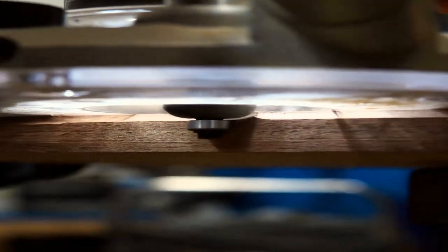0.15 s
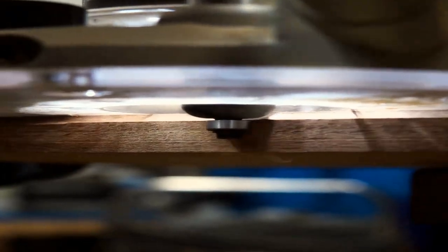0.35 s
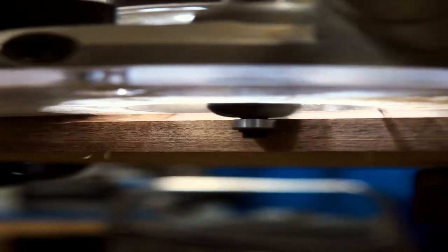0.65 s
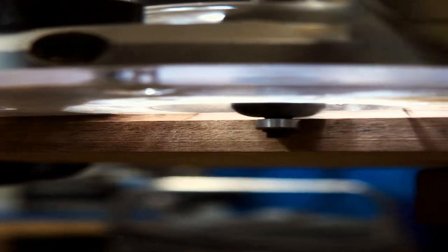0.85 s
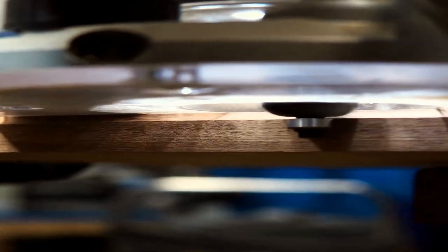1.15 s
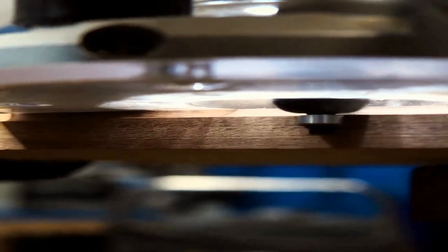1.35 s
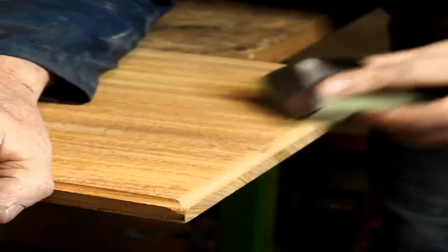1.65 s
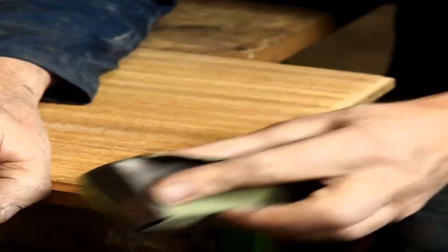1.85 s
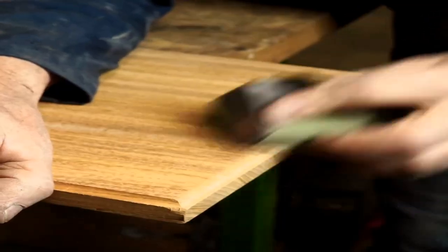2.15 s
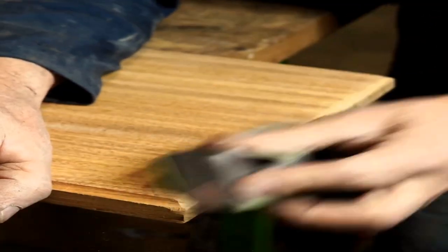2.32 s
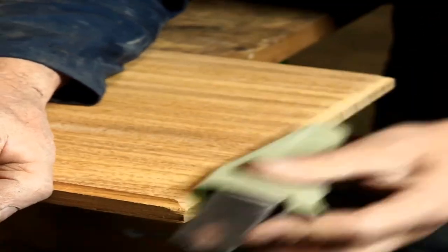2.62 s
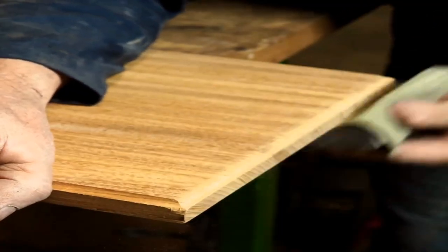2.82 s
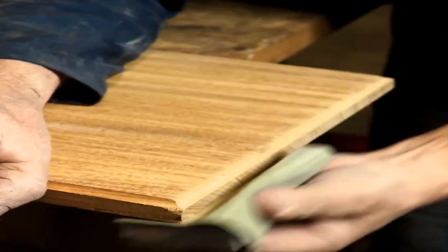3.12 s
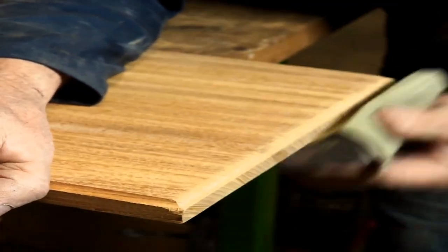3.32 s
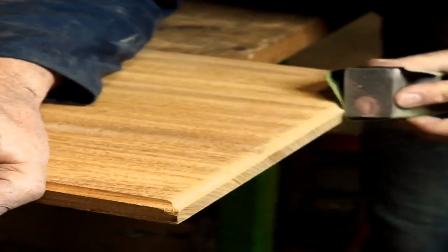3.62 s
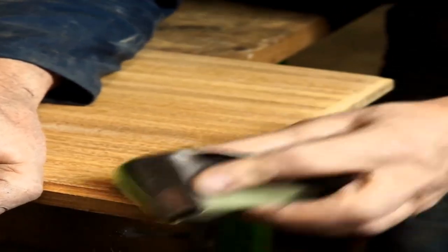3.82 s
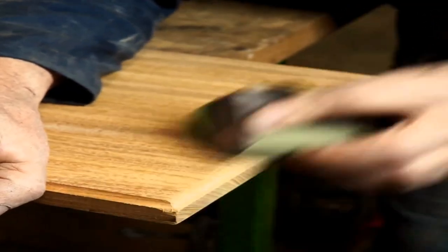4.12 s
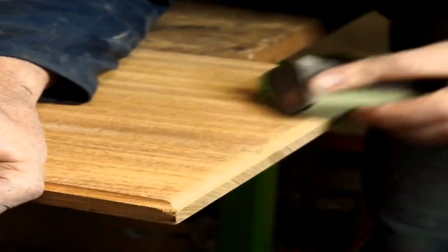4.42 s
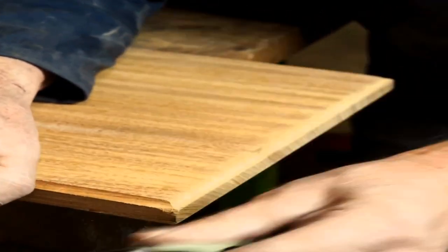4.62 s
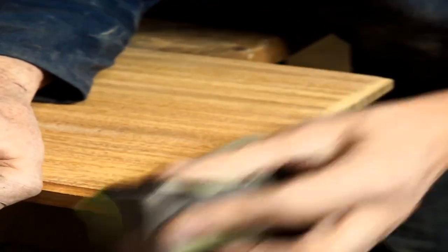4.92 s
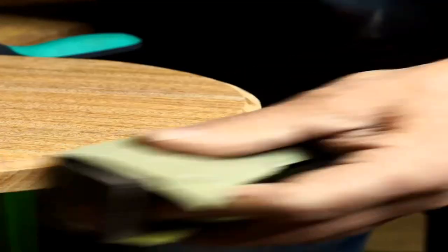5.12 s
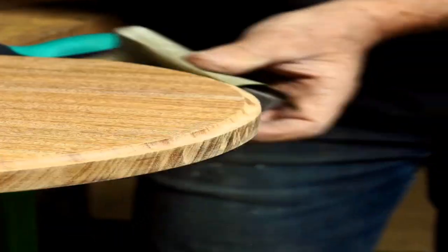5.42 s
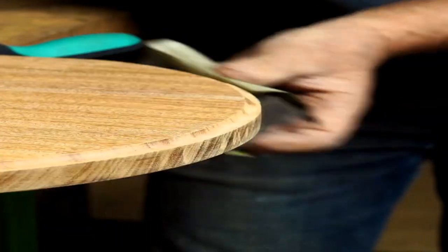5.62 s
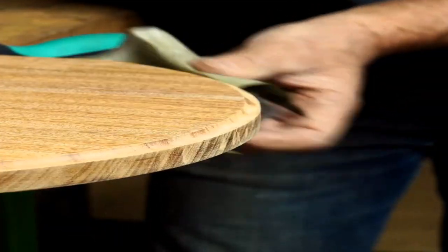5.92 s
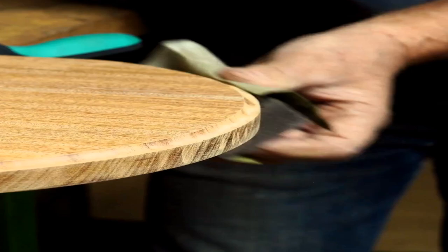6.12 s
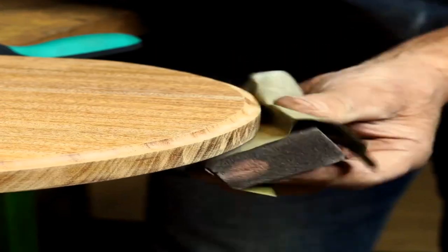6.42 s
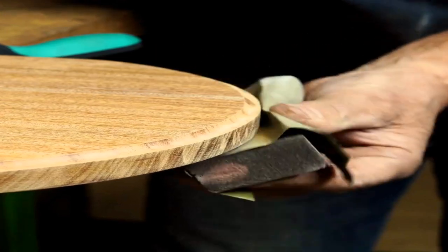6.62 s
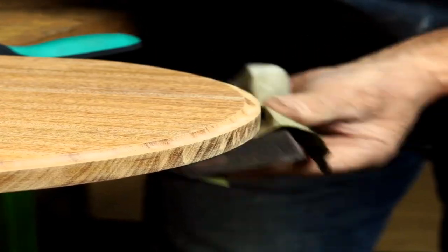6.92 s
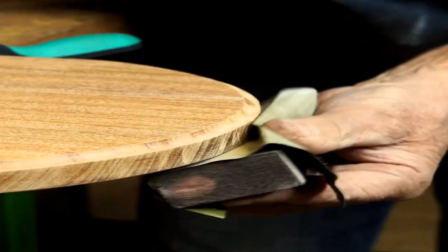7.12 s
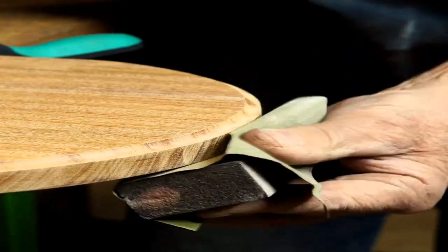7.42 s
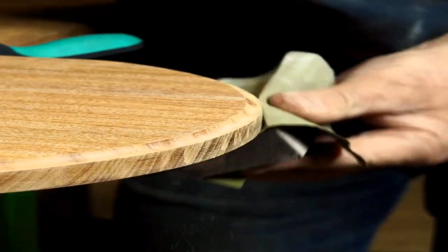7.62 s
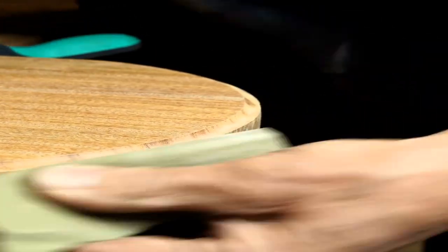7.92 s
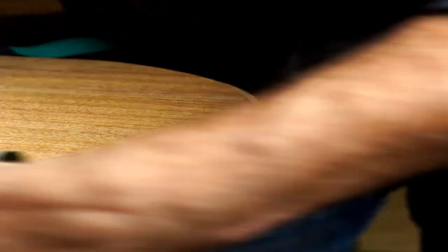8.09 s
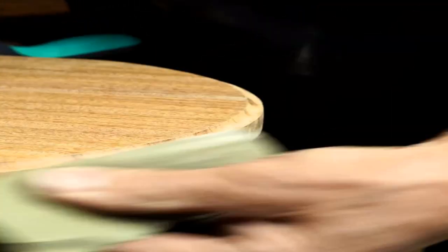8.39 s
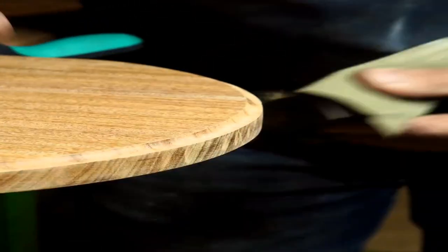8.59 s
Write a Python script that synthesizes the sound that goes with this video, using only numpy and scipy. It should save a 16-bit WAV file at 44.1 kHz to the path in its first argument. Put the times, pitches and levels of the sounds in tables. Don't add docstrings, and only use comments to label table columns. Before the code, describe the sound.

In a small workshop, an electric router cuts wood with a steady, buzzing harmonic whine and a rush of chip hiss for about a second. It stops abruptly, and a hand sanding block scratches quickly along a straight board edge, with knocks and low bench thuds. Then shorter, faster strokes rub a round board that rings more, ending in dragging rubs and a faint last touch. Close, wide stereo with a short room.

```python
import sys
import numpy as np
from scipy import signal
from scipy.io import wavfile

SR = 44100
rng = np.random.default_rng(int(sys.argv[2]) if len(sys.argv) > 2 else 0)


def gain_from_db(level_db):
    decades = np.asarray(level_db, float) / 20
    return 10 ** decades


def wav_out(sig):
    wavfile.write(sys.argv[1], SR, np.round(np.clip(np.atleast_2d(sig).T, -1, 1) * 32767).astype(np.int16))


N = 385875
STEP = 64
SANDING_FROM_S, ROUND_FROM_S = 1.084, 4.74

# echo delay in ms, sway of the delay in ms, level in dB.
ECHOES = [
    [(0.3, 0.25, -1.5), (2.3, 0.304, -6), (4.9, 0.394, -6), (8.6, 0.52, -2)],
    [(1.4, 0.261, -1), (3.1, 0.286, -1.5), (6.2, 0.378, -4), (11, 0.566, -13)],
]
# frequency in Hz, T60 in seconds.
SHOP_T60 = [(100, 0.13), (1000, 0.26), (4000, 0.59), (9000, 0.25), (16000, 0.019)]

# level in dB rms in phase, then in antiphase, at the
WHINE = [(-87, -42, -89.5, -37, -86.5, -39), (-42, -40, -46, -49, -44.5, -52),
         (-38, -48, -38, -46, -38.5, -37.0), (-34.5, -27, -35, -31, -35, -27),
         (-40, -39.5, -35.5, -46, -33, -34.0), (-48, -40, -39.5, -40.5, -34.5, -30),
         (-54, -43, -48, -43, -42, -61.5), (-40.5, -41, -37.5, -35.5, -37.5, -44.0),
         (-42, -42.5, -41.5, -39.0, -41, -41), (-46, -48.0, -44, -44.5, -39, -37),
         (-47, -43.5, -37, -34, -41, -61.0), (-43, -30, -43, -35.0, -33, -31),
         (-51, -46.0, -56, -45.5, -42, -41.0), (-39, -41.5, -40, -43, -38, -34),
         (-48, -43.0, -40, -45, -40, -41.5), (-66, -45, -37, -33, -51, -38),
         (-50, -45.0, -41, -41, -41.5, -40.0), (-51, -46.0, -46, -44.0, -46, -47.5),
         (-58, -49.0, -50, -47.5, -48, -55.0), (-56.0, -46.0, -56, -44.5, -52.0, -48.0),
         (-48, -47.0, -41, -36, -43, -40), (-55.5, -51.5, -45, -49.0, -51, -53.5),
         (-44, -58.0, -50, -53.5, -57.0, -58.5), (-63, -55.0, -48, -63.0, -51.5, -55.5),
         (-63, -52.5, -44, -52.5, -61, -59.5), (-61, -54.0, -49, -50.0, -68.0, -54.5),
         (-58, -54, -46, -49.5, -52.0, -51.5), (-53.5, -59.5, -55.0, -48.0, -49, -54.5),
         (-47, -60.5, -69, -80.0, -55, -50.5), (-60, -58.5, -58, -49.5, -62, -74.0)]
# time in seconds, chip hiss in dB, whine gain in dB.
CUT = [
    (0.0, -24.5, 3.5),
    (0.17, -25, 0.5),
    (1.06, -26, -2),
]
# time in seconds, gain in dB.
FLARE = [(0, -6), (.1, -6), (.16, 9), (.3, -5), (.55, 5.5), (.68, 3), (.85, -3), (1.1, -2)]
# frequency in Hz, level in dB per Hz.
CHIP_HISS = [(40, -46), (150, -20), (230, -21), (330, -16.5), (560, -10), (1000, -9), (1800, -7.5),
             (2100, -10.5), (3500, -13), (5200, -14), (8500, -13.5), (11000, -20), (13500, -35), (16000, 2)]
# frequency in Hz, width in Hz, depth from 0 to 1.
BASE_NOTCHES = [(2010, 230, 0.8), (3800, 160, 0.6), (4170, 130, .6), (6200, 340, 0.7), (8100, 640, 0.4)]

# turn of the hand in seconds, grit at the turn in dB,
# grit at full speed in dB, dig into the wood in dB.
STRAIGHT_STROKES = [(1.084, -45, -24.5, -2), (1.31, -40, -26.5, 2.5), (1.56, -40, -26, -1),
                    (1.757, -48, -28.5, 3.5), (1.998, -44, -23, -4.5), (2.183, -40, -26, 1),
                    (2.404, -36.5, -29.5, 4.5), (2.599, -41, -28, 3), (2.784, -41.5, -32, 4.5),
                    (2.98, -46, -30.5, 4), (3.137, -41.5, -27.5, 2.5), (3.323, -36, -28.5, 2),
                    (3.528, -38.5, -26, -1), (3.69, -36.5, -29, 3), (3.89, -33, -26, -1.5),
                    (4.06, -39, -33, 6), (4.22, -27, -27, 1), (4.525, -48, -25.5, -3.5),
                    (4.62, -27.5, -30, 3.5)]
# turn in seconds, grit at the turn in dB, at full speed in dB,
# dig in dB.
QUICK_STROKES = [(5.153, -44, -28, 0.2), (5.276, -40, -25, -1.5), (5.38, -36, -28.5, -1.5),
                 (5.48, -41.5, -25.5, -2.5), (5.589, -42, -29.5, 1.5), (5.681, -43, -30.5, 0),
                 (5.782, -42, -29.5, -1), (5.896, -40.5, -33.5, 2), (6.003, -41, -26, -3.5),
                 (6.104, -38, -27.5, -2), (6.217, -38.5, -29.5, -3), (6.337, -35.5, -29, -2),
                 (6.442, -43, -27.5, -0.5), (6.55, -35, -26.5, -2.5), (6.683, -41, -27.5, 0),
                 (6.82, -36, -27, 0), (6.96, -39.5, -23.5, -2), (7.134, -39, -30, 1)]
# turn in seconds, grit at the turn in dB, at full speed in dB, dig in dB.
DRAGS = [(4.737, -44.5, -31.5, -0.5), (4.87, -32.5, -33, 1.5), (5.02, -35, -31, -2),
         (7.267, -41, -27.5, -4.5), (7.6, -33.5, -36.5, 4.5), (7.79, -41.5, -39.5, 0.5),
         (7.882, -62.5, -43.5, 4), (8.011, -33, -31, 6), (8.134, -31.5, -29, 3.5), (8.29, -50, -54.5, 10.5),
         (8.46, -62, -48.5, 0.5), (8.62, -46.5, -47.5, -0.5), (8.76, -51, -51, -17)]
# turn in seconds, part of the stroke
STROKE_SHAPE = [(1.084, 0.46, 1.44), (1.31, 0.48, 1.5), (1.56, 0.51, 0.75), (1.757, 0.54, 0.46),
                (1.998, 0.47, 0.5), (2.183, 0.44, 1.1), (2.404, 0.46, 2.4), (2.599, 0.58, 1.9),
                (2.784, 0.44, 0.88), (2.98, 0.51, 0.98), (3.137, 0.34, 1.7), (3.323, 0.52, 1.8),
                (3.528, 0.68, 1.05), (3.69, 0.49, 2.1), (3.89, 0.42, 1.5), (4.06, 0.47, 1.4),
                (4.22, 0.18, 4.3), (4.515, 0.53, 1.35), (4.736, 0.62, 2.6), (4.87, 0.77, 2),
                (5.02, 0.63, 1.7), (5.153, 0.46, 1.9), (5.276, 0.58, 2.8), (5.38, 0.58, 1.5),
                (5.48, 0.58, 1.4), (5.589, 0.39, 0.94), (5.681, 0.65, 1.3), (5.782, 0.43, 1.4),
                (5.896, 0.57, 1.8), (6.003, 0.45, 1.3), (6.104, 0.59, 1.1), (6.217, 0.37, 2),
                (6.337, 0.54, 0.67), (6.442, 0.6, 0.9), (6.55, 0.66, 0.93), (6.683, 0.37, 1.2),
                (6.82, 0.7, 1.1), (6.96, 0.61, 1.2), (7.134, 0.63, 1.2), (7.267, 0.26, 3), (7.6, 0.6, 2.4),
                (7.79, 0.22, 2.1), (7.882, 0.13, 2.7), (8.012, 0.45, 0.8), (8.134, 0.33, 2),
                (8.29, 0.23, 3.4), (8.46, 0.55, 1.7), (8.62, 0.75, 2), (8.76, 0.5, 1),
                (4.62, 0.22, 2.3),
]

# time in seconds, peak in dB.
KNOCKS = [(1.153, -29), (1.324, -43), (1.474, -38), (1.592, -32), (1.773, -45), (2.036, -29), (2.149, -46),
          (2.273, -28), (2.383, -45), (2.492, -36), (2.644, -40), (2.796, -31), (2.999, -38),
          (3.107, -29.5), (3.178, -43), (3.303, -42), (3.473, -41), (3.754, -24), (4.088, -37),
          (4.315, -29), (4.631, -41), (4.757, -42), (4.923, -41), (5.07, -34), (5.205, -36), (5.276, -47),
          (5.356, -36), (5.455, -43), (5.602, -34), (5.809, -36), (5.955, -31), (6.076, -39), (6.236, -39),
          (6.383, -39), (6.515, -49), (6.714, -45), (6.858, -44), (6.934, -35), (7.14, -49), (7.49, -38),
          (7.634, -31), (7.742, -30), (7.894, -43), (8.02, -40)]
# frequency in Hz, width in Hz, level in dB.
KNOCK_BODY = [(335, 54, -8), (418, 47, -6), (614, 110, 8)]
# time in seconds, thud in dB.
JOLTS = [(1.2, -50), (1.36, -52), (1.74, -50), (1.95, -49), (2.27, -50), (2.64, -53), (2.811, -43.5),
         (3.154, -65), (3.39, -47), (3.77, -57), (4.09, -52.5), (4.33, -46), (4.5, -53), (4.861, -46),
         (5.16, -48), (5.37, -48), (5.54, -50), (5.78, -54), (5.91, -49), (6.03, -47), (6.19, -45),
         (6.4, -46), (6.63, -49), (6.87, -48), (7.02, -45), (7.2, -48), (7.53, -47), (8.042, -52),
         (8.21, -48)]
# frequency in Hz, width in Hz, level in dB.
BENCH_STRAIGHT = [(65, 33, -5.5), (94, 19, -1), (141.4, 26, 3.5)]
# frequency in Hz, width in Hz, level in dB.
BENCH_ROUND = [(60.3, 28, -13), (92, 36, 6), (140, 23, -4)]
# frequency in Hz, level in dB per Hz.
SCRAPE = [(200, -30.5), (300, -5), (450, -11.5), (700, -9), (1000, -3), (1300, -13.5)]
# time in seconds, scrape level in dB.
WEIGHT = [(1.1, -43), (2.3, -38.5), (2.6, -49), (3.75, -43), (4.1, -42.5), (4.6, -45), (5.0, -43),
          (5.25, -36), (6.6, -36), (6.85, -48), (7.3, -36), (7.55, -31.5), (7.72, -27.5), (7.85, -32.5),
          (7.93, -27.5), (8.0, -29.5), (8.1, -52), (8.7, -57)]
# time in seconds, tilt in dB per octave.
GRIP = [(1.15, -1), (1.35, 5.5), (1.6, 3), (2.0, 1.5), (2.3, -2.5), (2.8, 3), (3.3, 2), (3.75, -2),
        (4.2, -3), (4.7, 0), (5.2, 1), (6.0, 1.5), (6.8, -3), (7.45, 1), (7.6, 6), (7.95, 8), (8.2, 0),
        (8.6, -3)]

# middle in seconds, length in seconds, pitch in Hz,
# level in dB rms.
SINGING = [(4.932, 0.24, 1630, -25), (6.169, .08, 1750, -30), (6.3, .04, 1800, -26),
           (6.4, 0.091, 1830, -25), (6.619, 0.11, 1800, -27), (7.1, 0.13, 1640, -28),
           (7.462, .1, 1720, -32), (7.63, 0.12, 1686, -26), (8.069, 0.29, 1690, -27),
           (8.193, .14, 2390, -32), (8.639, 0.27, 2050, -45)]
# frequency in Hz, level in dB per Hz.
GRIT_STRAIGHT = [(700, -18), (1100, -14), (1600, -6), (2500, -3.5), (4100, -1), (5500, -4), (7800, -1.5),
                 (8600, -3), (13000, -7.5), (16000, -2)]
# frequency in Hz, level in dB per Hz.
GRIT_ROUND = [(700, -13), (1100, -6), (1600, 0), (2500, -2), (4100, -4), (5500, -7), (7800, -6.5),
              (8600, -8.5), (13000, -10.5), (16000, -7)]
# time in seconds, tilt in dB per octave.
LEAN = [(1.2, 1), (1.43, -0.5), (1.65, 1.5), (1.87, -0.5), (2.08, 0.5), (2.28, -2.5), (2.5, 0.5),
        (2.7, 0.5), (2.87, 1.5), (3.05, 1), (3.22, 1), (3.42, 0), (3.6, 1), (3.78, 0), (3.97, 2),
        (4.15, -2.5), (4.3, -2), (4.63, -3), (4.9, 0), (5.2, 0.5), (5.6, 0), (6.0, 0), (6.4, -0.5),
        (6.8, 0), (7.1, 0.5), (7.5, 0), (7.8, 0), (8.05, -2.5), (8.2, 0.5), (8.6, -3.5)]
# frequency in Hz, width in Hz, level in dB.
BOARD = [(1373, 190, 8.5), (1625, 98, 12.5), (1830, 26, 0.5), (2060, 72, 12), (800, 63, -6.5)]
# time in seconds, ring against the grit in dB.
FREE_RING = [(1.1, 3), (1.4, -3.5), (1.7, -7), (2.2, -1), (2.9, -1.5), (3.2, 4), (3.7, -8), (4.0, -10),
             (4.25, -2), (4.4, -9), (4.52, 0), (4.65, 0), (4.8, 0), (4.87, 8), (4.93, 15), (5.08, 9),
             (5.15, -2), (5.3, -1), (5.45, 6.5), (5.7, -10), (5.92, 6), (6.0, 2), (6.17, 13.5), (6.24, 0),
             (6.32, 12), (6.6, 7.5), (6.9, 3), (7.0, -2), (7.09, 9), (7.2, 1), (7.3, 2), (7.5, 14.5),
             (7.7, 9), (7.82, 6), (7.95, 13), (8.1, -10), (8.22, -19.5), (8.6, 2)]


def rms_one(x):
    return x / np.sqrt(np.mean(x ** 2) + 1e-20)


def in_time(rows, size=N):
    s, *columns = np.transpose(rows)
    t = np.arange(size // STEP + 1) * STEP / SR
    return [np.interp(t, s, column) for column in columns]


def smooth(coarse, size=N):
    return np.interp(np.arange(size) / STEP, np.arange(len(coarse)), coarse)


def at_hz(points, hz):
    point_hz, values = np.transpose(points)
    return np.interp(np.log(hz), np.log(point_hz), values)


def drift(rate_hz, size=N):
    r = np.exp(-2 * np.pi * rate_hz * STEP / SR)
    noise = rng.standard_normal(size // STEP + 1001)
    return rms_one(signal.lfilter([1], [1, -2 * r, r * r], noise)[1000:])


def band_pass(x, low_hz, high_hz):
    return signal.sosfilt(signal.butter(2, [low_hz, high_hz], "band", fs=SR, output="sos"), x)


def grains(per_s, spread_db, size=N):
    draw = rng.laplace(0, 1, (2, 2, size))
    torn = rng.random((2, 2, size), dtype=np.float32) < per_s / SR
    click = np.sign(draw) * gain_from_db(spread_db * np.minimum(np.abs(draw), 5))
    return rms_one(np.where(torn, click, 0))


def coloured(source, spectrum_db, low_hz, high_hz, patchy_db, alike, octaves=1 / 3):
    size, bands = source.shape[-1], 0
    edges = low_hz * 2 ** np.arange(0, np.log2(high_hz / low_hz) + octaves, octaves)
    for k, (low, high) in enumerate(zip(edges, edges[1:])):
        mid, side = band_pass(source[k % 2], low, high)
        level_db = spectrum_db(np.sqrt(low * high)) + patchy_db * drift(15.3, size)
        pair = np.sqrt(1 + alike) * mid + np.sqrt(1 - alike) * side * [[1], [-1]]
        bands = bands + smooth(gain_from_db(level_db), size) * pair
    return bands


def modes(source, table, wander_db):
    out = 0
    for k, (hz, width_hz, level_db) in enumerate(table):
        r = np.exp(-np.pi * width_hz / SR)
        poles = [1, -2 * r * np.cos(2 * np.pi * hz / SR), r * r]
        mode = signal.lfilter([1, 0, -1], poles, source[k % 2])
        gain = smooth(gain_from_db(level_db + wander_db * drift(15.0)))
        out = out + (-1) ** k * gain * rms_one(mode)
    return rms_one(out)


def shop_air():
    hum = rms_one(band_pass(rng.standard_normal((2, N)), 190, 800))
    hum = gain_from_db(-59) * hum * (np.arange(N) > SANDING_FROM_S * SR)
    air = gain_from_db(-56.5) * signal.lfilter([1, -1], [1, -.96], rng.standard_normal((2, N)))
    return hum + air


def shop(x, wet_db):
    size, tail = SR // 2, 0
    t = np.arange(size) / SR
    for low in 63 * 2. ** np.arange(8):
        band = band_pass(rng.standard_normal((2, size)), low, 2 * low)
        tail = tail + band * gain_from_db(-60 * t / at_hz(SHOP_T60, 2.28 * low))
    tail[:, :SR // 200] = 0
    tail = tail / np.sqrt(np.sum(tail ** 2) / 2)
    return x + gain_from_db(wet_db) * signal.fftconvolve(x, tail, axes=1)[:, :N]


def near_echoes(x, motion=1):
    size = x.shape[-1]
    out = np.zeros((2, size))
    for side, paths in enumerate(ECHOES):
        for delay_ms, sway_ms, level_db in paths:
            lag = smooth(delay_ms + motion * sway_ms * drift(1.5, size), size) * SR / 1000
            read = np.clip(np.arange(size) - lag, 0, size - 2)
            whole = read.astype(int)
            between = (read - whole) * np.diff(x[side])[whole]
            out[side] += gain_from_db(level_db) * (x[side, whole] + between)
    return out


def whine(turn, whine_db):
    size = len(turn)
    out = np.zeros((2, size))
    stage, = in_time([(.2, 0), (.6, 1), (0.803, 1), (0.883, 2)], size)
    for order, levels_db in enumerate(WHINE, start=1):
        mid_db = np.interp(stage, range(3), levels_db[0::2])
        side_db = np.interp(stage, range(3), levels_db[1::2])
        if order == 14:
            mid_db = mid_db + in_time(FLARE, size)[0]
        phase = order * turn + rng.uniform(0, 2 * np.pi)
        mid = smooth(gain_from_db(whine_db + mid_db + 2.04 * drift(16.5, size)), size) * np.sin(phase)
        side = smooth(gain_from_db(whine_db + side_db + 2.9 * drift(5.5, size)), size) * np.cos(phase)
        out += np.sqrt(2) * np.array([mid + side, mid - side])
    return out


def chip_hiss(turn, hiss_db):
    chips = grains(14000, 2.5, len(turn)) * (1 + 0.28 * np.cos(2 * turn))

    def chip_db(hz):
        return at_hz(CHIP_HISS, hz) + hiss_db + 12.5

    hiss = coloured(chips, chip_db, 40.3, 15000, patchy_db=2.5, alike=0.59)
    hiss = near_echoes(hiss, motion=0.29) * gain_from_db(-2.0)
    for hz, width_hz, depth in BASE_NOTCHES:
        hiss = hiss - depth * signal.lfilter(*signal.iirpeak(hz, hz / width_hz, fs=SR), hiss)
    return hiss * gain_from_db([[-2.1], [2.1]])


def router():
    size = round(1.2 * SR)
    spindle_hz, end_s, fade_s = 240.4, 1.123, 0.049
    hiss_db, whine_db = in_time(CUT, size)
    turn = 2 * np.pi * np.cumsum(spindle_hz * (1 + .0006 * smooth(drift(8, size), size))) / SR
    fade = np.clip((end_s - np.arange(size) / SR) / fade_s, 0, 1)
    cutting = (whine(turn, whine_db) + chip_hiss(turn, hiss_db)) * fade
    return np.pad(cutting, [(0, 0), (0, N - size)])


def rubbing(fullness):
    turn_s, turn_db, fast_db, dig_db = np.transpose(sorted(STRAIGHT_STROKES + QUICK_STROKES + DRAGS))
    _, share, pointed = np.transpose(sorted(STROKE_SHAPE))
    fast_s = turn_s + 0.97 * share * np.diff(turn_s, append=turn_s[-1] + .1)
    t = np.arange(N // STEP + 1) * STEP / SR
    place = np.interp(t, np.ravel([turn_s, fast_s], "F"), np.arange(2 * len(turn_s)))
    stroke = (place // 2).astype(int)
    nearest_turn = np.minimum((place + 1) // 2, len(turn_s) - 1).astype(int)
    speed = np.abs(np.sin(np.pi / 2 * place)) ** (fullness * pointed[stroke])
    level_db = turn_db[nearest_turn] + (fast_db[stroke] - turn_db[nearest_turn]) * speed
    shortfall_db = np.clip(np.interp(t, fast_s, fast_db) - level_db, 0, 12)
    level_db = level_db - 60 * (t < turn_s[0])
    return level_db, shortfall_db, np.interp(t, fast_s, dig_db), t - turn_s[stroke]


def bench_thuds():
    t = np.arange(N // STEP + 1) * STEP / SR
    rise_db_per_s, fall_db_per_s, rest_db = 164, 105, -57
    jolts_db = [db - np.maximum(rise_db_per_s * (s - t), fall_db_per_s * (t - s)) for s, db in JOLTS]
    thud_db = np.maximum(np.max(jolts_db, axis=0), rest_db)
    white = rng.standard_normal((2, 2, N))
    straight = modes(white, BENCH_STRAIGHT, wander_db=4.5)
    round_board = modes(white, BENCH_ROUND, wander_db=3.5)
    rocking = band_pass(np.where(np.arange(N) < ROUND_FROM_S * SR, straight, round_board), 35, 230)
    thud = smooth(gain_from_db(thud_db + 1.5)) * (rocking - 0.026 * rocking[::-1])
    return thud * (np.arange(N) > SANDING_FROM_S * SR)


def knocks():
    rise_s, t60_s, gain_db = 0.011, 0.24, -2.5
    t = np.arange(N // STEP + 1) * STEP / SR
    s, db = np.transpose(KNOCKS)[:, :, None]
    since = t - s + rise_s
    decay = gain_from_db(db + gain_db - 60 * np.maximum(since, 0) / t60_s)
    blow = np.max(decay * np.clip(since / rise_s, 0, 1), axis=0)
    body = modes(rng.standard_normal((2, 2, N)), KNOCK_BODY, wander_db=6.0)
    return smooth(blow) * (body - 0.12 * body[::-1])


def scrape():
    rub_db, shortfall_db, dig_db, since_turn_s = rubbing(fullness=0.98)
    t = np.arange(len(rub_db)) * STEP / SR
    catch_db = 7 * np.exp(-((since_turn_s - 0.05) / 0.037) ** 2)
    catch_db = catch_db * np.where(t < ROUND_FROM_S, 1, 0.4)
    speed_db = 0.86 * (rub_db + 1.28 * shortfall_db + 26.0)
    scrape_db = in_time(WEIGHT)[0] + catch_db + dig_db + speed_db
    grip, = in_time(GRIP)

    def drag_db(hz):
        return at_hz(SCRAPE, hz) + grip * np.clip(np.log2(hz / 500), -1, 1) + scrape_db + 14.5

    white = rng.standard_normal((2, 2, N))
    dull = coloured(white, drag_db, 197.4, 1000, patchy_db=2.5, alike=-0.088, octaves=0.609)
    return dull * (np.arange(N) > SANDING_FROM_S * SR)


def singing():
    out = np.zeros((2, N))
    for middle_s, length_s, hz, level_db in SINGING:
        resonance = signal.iirpeak(hz, hz / 31, fs=SR)
        tone = signal.lfilter(*resonance, rng.standard_normal((2, SR // 2)))
        at = round(middle_s * SR) - SR // 4 + np.arange(SR // 2)
        swell = np.cos(np.pi * np.clip((at / SR - middle_s) / length_s, -.5, .5))
        out[:, at[at < N]] += (gain_from_db(level_db) * swell * rms_one(tone))[:, at < N]
    return out


def sandpaper():
    rub_db, shortfall_db, dig_db, _ = rubbing(fullness=0.75)
    ring_db = in_time(FREE_RING)[0] + 0.54 * dig_db
    uneven = smooth(gain_from_db(.9 * drift(30) + 1.3 * drift(170)))
    clicks = grains(12000, 4.47) * uneven
    on_round, = in_time([(ROUND_FROM_S - .05, 0), (ROUND_FROM_S + 0.031, 1), (7.95, 1),
                         (8.05, .3), (9.2, .3), (9.3, 1)])
    lean, = in_time(LEAN)

    def grit_db(hz):
        colour_db = (1 - on_round) * at_hz(GRIT_STRAIGHT, hz) + on_round * at_hz(GRIT_ROUND, hz)
        colour_db = colour_db + lean * np.clip(np.log2(hz / 3520), -1, 1)
        dull_db = 0.3 * shortfall_db * (hz > 7000)
        lift_db = dig_db + (0.34 + 0.028 * on_round) * shortfall_db
        return rub_db + 13.5 + colour_db - dull_db + lift_db * np.clip(np.log2(11000 / hz), 0, 1)

    ring_gain = smooth(gain_from_db(rub_db + 1.02 * shortfall_db + ring_db - 8.0))
    ring = ring_gain * modes(clicks, BOARD, wander_db=3.5)
    return coloured(clicks, grit_db, 630, 15000, patchy_db=.9, alike=1.0) + ring


def scene():
    sanding = shop(near_echoes(sandpaper()) * gain_from_db(-1.98), wet_db=-11.0)
    block = scrape() + bench_thuds() + knocks() + singing()
    return shop_air() + router() + block + sanding


def low_pass(x):
    return signal.sosfilt(signal.butter(12, 15880, fs=SR, output="sos"), x)


def record(dry):
    top = .95
    treble = signal.butter(2, 6900, "high", fs=SR, output="sos")
    apart = signal.sosfilt(treble, (dry[0] - dry[1])[::-1])[::-1]
    apart = signal.sosfilt(treble, apart)
    heard = dry - 0.1 / 2 * apart * [[1], [-1]]
    return low_pass(top * np.tanh(heard / top))


dry = scene()
out = record(dry)
wav_out(out)
```